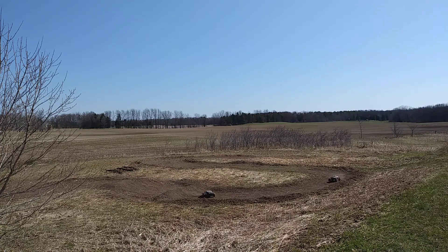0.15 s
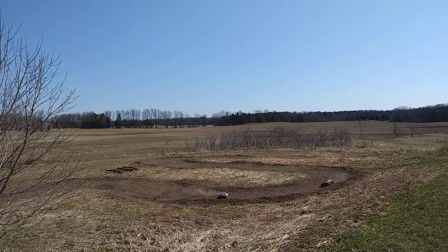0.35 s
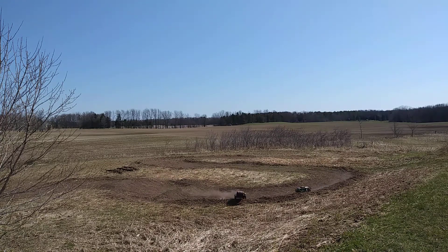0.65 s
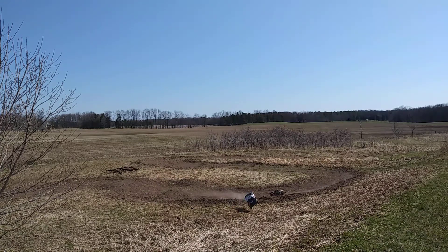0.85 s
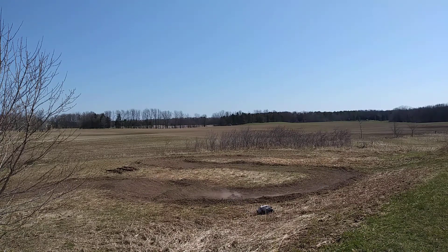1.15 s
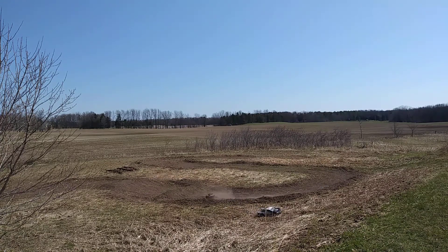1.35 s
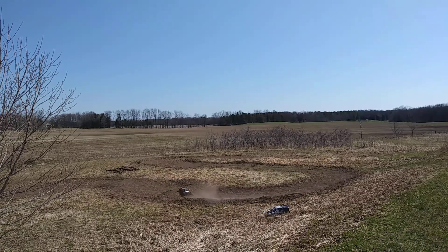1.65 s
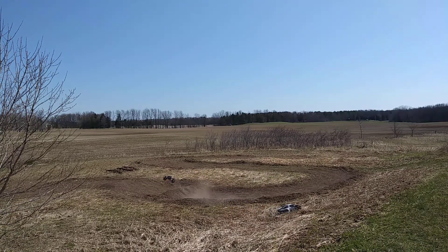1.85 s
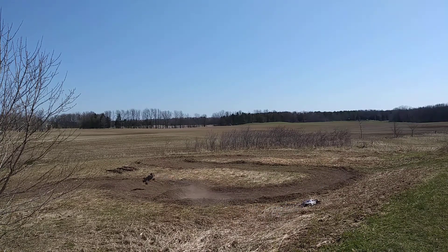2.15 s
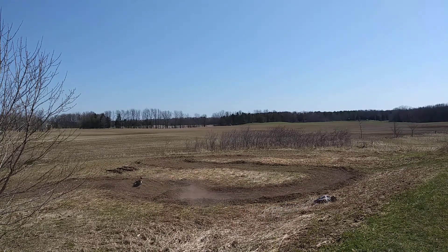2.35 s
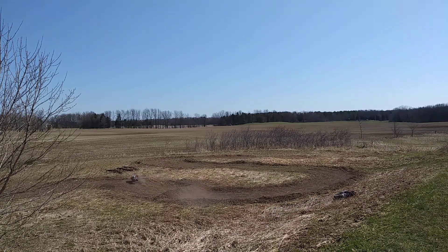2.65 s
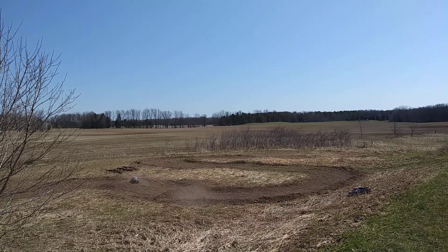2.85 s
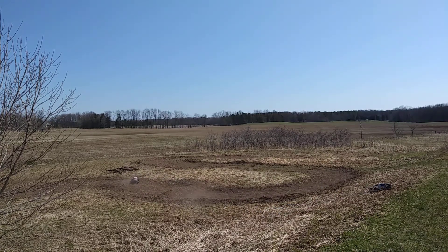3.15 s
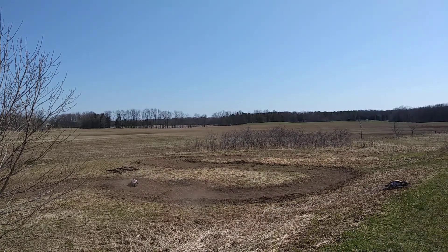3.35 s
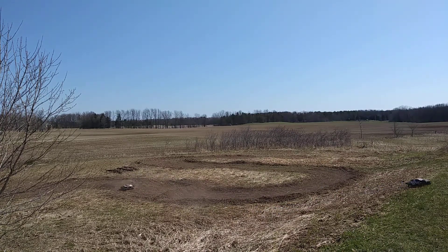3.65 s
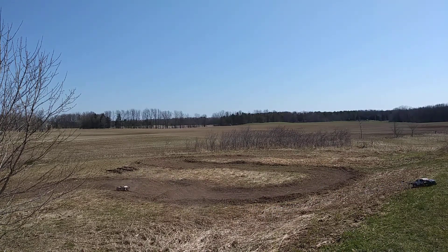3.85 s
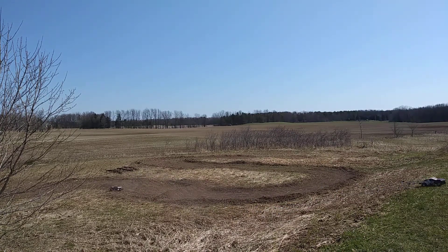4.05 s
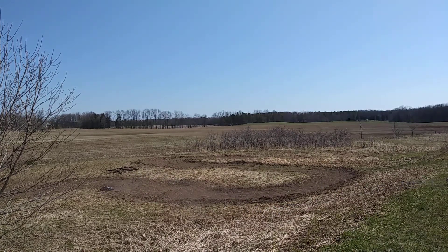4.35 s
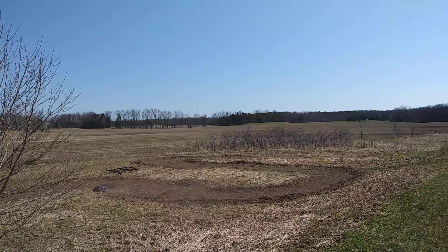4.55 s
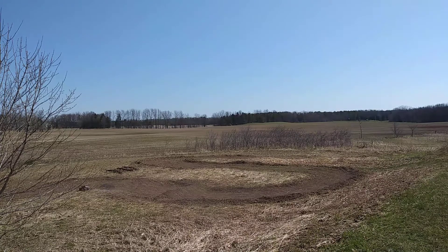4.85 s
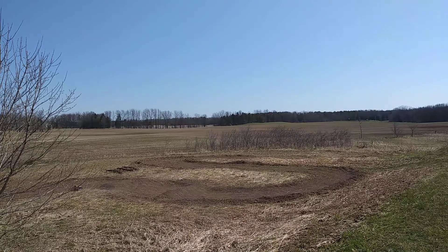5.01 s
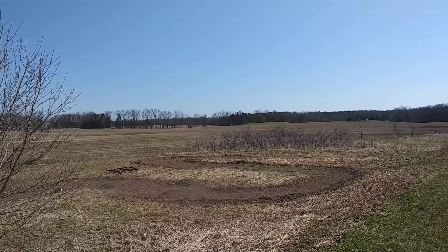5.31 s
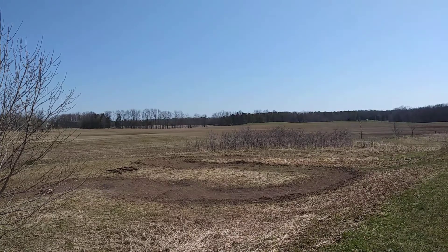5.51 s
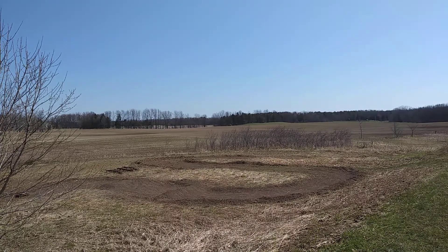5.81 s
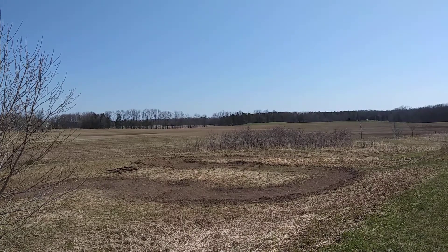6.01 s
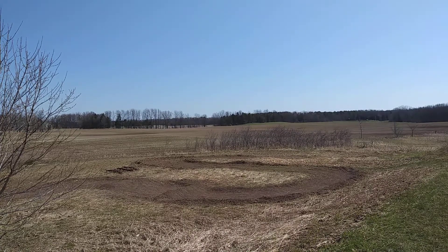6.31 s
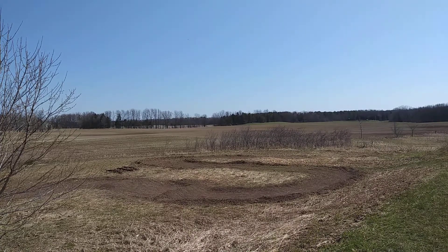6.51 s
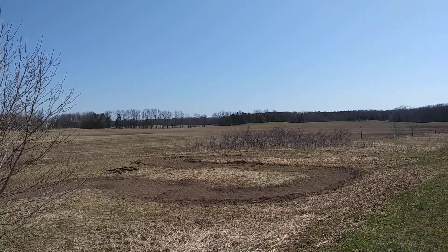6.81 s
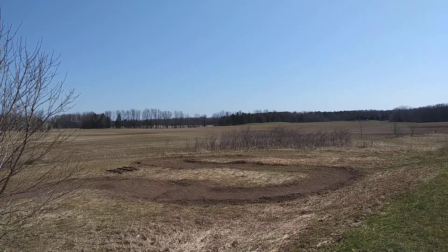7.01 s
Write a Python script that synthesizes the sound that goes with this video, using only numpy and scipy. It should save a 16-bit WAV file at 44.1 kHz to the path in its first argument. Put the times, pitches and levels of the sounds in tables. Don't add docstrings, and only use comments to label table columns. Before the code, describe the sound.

An open field heard through a small, bass-light microphone with slight noise suppression. From 0 s two electric model trucks rattle over dirt, bright grit spraying on plastic shells, with rough gear whine and low wind thumps. At about 0.6-0.75 s a dense volley of hard plastic slaps breaks out, with a narrow tyre rasp that slides on to about 1 s. The noise dips, then swells at 1.5-2.2 s with rising motor whine and loud wheelspin. A few knocks and crunches come at 2.3-2.4 s. From 2.5 to 3.5 s short, broken gear whines flutter over thinning tyre noise. Strong gusts buffet at 3.9-4.1 s alongside another throttle burst until 4.4 s. Afterwards the trucks are distant, with wavering whirr and drone and small gravel spurts near 5.7 and 6.5 s, fading by 7 s. Short clear thrush whistles recur throughout, with a quick trill around 6-6.45 s.

```python
import sys
import numpy as np
from scipy import signal
from scipy.io import wavfile
from scipy.ndimage import uniform_filter1d

SR = 44100
rng = np.random.default_rng(int(sys.argv[2]) if len(sys.argv) > 2 else 0)


def to_wav(sig):
    pcm = np.clip(np.atleast_2d(sig), -1, 1) * 32767
    pcm = np.round(pcm).astype(np.int16)
    wavfile.write(sys.argv[1], SR, pcm.T)


def gain_from_decibels(decibels):
    exponent = np.asarray(decibels, float) / 20
    return 10 ** exponent


N = 316183
STEP = 32


def control_times_s():
    return np.arange(N // STEP + 2) * STEP / SR


def in_time(rows):
    s, *columns = np.transpose(rows)
    return [np.interp(control_times_s(), s, column) for column in columns]


def fine(control):
    return np.interp(np.arange(N) / STEP, np.arange(len(control)), control)


def rms_one(x):
    return x / np.sqrt(np.mean(x ** 2) + 1e-20)


def drift(rate_hz):
    r = np.exp(-2 * np.pi * STEP * rate_hz / SR)
    noise = rng.standard_normal(N // STEP + 2002)
    return rms_one(signal.lfilter([1], [1, -2 * r, r * r], noise)[2000:])


def at_hz(points, hz):
    point_hz, level_db = np.transpose(points)
    return np.interp(np.log(hz), np.log(point_hz), level_db)


def sos(x, *design, **settings):
    return signal.sosfilt(signal.butter(*design, fs=SR, output="sos", **settings), x)


def band(x, low_hz, high_hz):
    return rms_one(sos(x, 2, [low_hz, high_hz], "band"))


def grains(per_s, spread_db):
    sizes = gain_from_decibels(spread_db * np.minimum(rng.exponential(1, N), 5)) * rng.choice([-1, 1], N)
    return rms_one(sizes * (rng.random(N) < per_s / SR))


def spells(rows, edge_db_per_s):
    t = control_times_s()
    levels_db = []
    for s, length_s, db in rows:
        outside_s = np.maximum(0, np.maximum(s - t, t - s - length_s))
        levels_db.append(db - edge_db_per_s * outside_s)
    return np.max(levels_db, axis=0)


def together(*levels_db):
    return 10 * np.log10(sum(gain_from_decibels(2 * np.maximum(db, -150)) for db in levels_db))


def bursts(events, source, noisy, late_s):
    out = np.zeros(N + 2000)
    around = np.arange(-800, 800)
    t = around / SR
    for (s, peak_db, hz, width_ms), phase in zip(events, rng.random(len(events))):
        at = round((s + late_s) * SR) + around
        sign = np.sign(np.sin(20 * phase))
        cycles = sign * np.cos(2 * np.pi * hz * t + phase - .5)
        bell = np.exp(-(1000 * t / width_ms) ** 2)
        out[at] += gain_from_decibels(peak_db) * bell * (cycles + noisy * source[at % N])
    return out[:N]


def glide(notes, wobble, shimmer_db, fade_s):
    out = np.zeros(N)
    bend = fine(1 + wobble * drift(58.0))
    swell = fine(gain_from_decibels(shimmer_db * drift(51)))
    for rows in notes:
        s, hz, level_db = np.transpose(rows)
        at = np.arange(max(int((s[0] - fade_s) * SR), 0), min(int((s[-1] + fade_s) * SR), N))
        t = at / SR
        gate = np.clip(np.minimum(t - s[0], s[-1] - t) / fade_s + .5, 0, 1)
        turns = np.cumsum(np.interp(t, s, hz) * bend[at]) / SR
        level = np.sqrt(2) * gain_from_decibels(np.interp(t, s, level_db))
        out[at] += level * gate * np.sin(2 * np.pi * turns)
    return out * swell


# (level at usual pace [dB], share of pace swing, wheelspin lift over gravel [dB])
LAYERS = [
    (-50.5, 0.36, 1.5),
    (-50, 0.61, -2),
    (-43.5, 0.38, 4.5),
    (-59.5, 0.32, -1),
]
# (start [s], length [s], gravel level [dB])
SPINS = [(0, 0.31, -51.5), (.53, .06, -54.5), (.6, 0.065, -45), (.71, 0.014, -47), (.8, 0.2, -59.5),
         (1.165, 0.0063, -58), (1.275, 0.014, -63), (1.59, .2, -46.5), (1.77, 0.358, -45),
         (2.2, 0.028, -58), (2.36, 0.033, -47.5), (2.575, 0.058, -54), (2.705, 0.061, -52),
         (2.81, 0.095, -52.5), (3.29, 0.12, -48), (4.08, 0.32, -48.5), (5.72, 1, -62), (6.545, 0.11, -48),
         (6.7, 0.075, -55)]
USUAL_PACE_DB, SPIN_EDGE_DB_PER_S = -50, 280


def loads(pace_db):
    spin_db = spells(SPINS, SPIN_EDGE_DB_PER_S)
    return [together(db + share * (pace_db - USUAL_PACE_DB), spin_db + lift_db)
            for db, share, lift_db in LAYERS]


# (time [s], pace as shell rattle [dB], share of far colour [0-1])
ROLL = [(0, -42, 0.6), (.2, -38, 0.56), (.75, -40.5, 0.5), (1.1, -49, 0.4), (1.5, -42.5, 0.97),
        (2.25, -42.5, 0.09), (2.6, -54.5, 0.38), (3.0, -63, 0.2), (3.2, -47, 0.75), (3.75, -75.5, 0.64),
        (3.92, -52, 0.38), (4.8, -54.5, 0.71), (5.07, -77, 0.7), (5.3, -63, 0.62), (5.7, -56, 0.99),
        (6.4, -60.5, 0.78), (6.85, -63, 0.46), (7.17, -64, 1)]
# (frequency [Hz], density [dB per Hz])
NEAR_COLOUR = [(350, -5), (992, 4), (1470, -6.5), (1880, -1.5), (2270, -7), (2790, -9.5), (3710, -8),
               (5080, -13.5), (7030, -20.5), (8060, -34.5), (11200, -37.5), (15500, -71.5)]
FAR_COLOUR = [(480, -31), (730, -8), (900, -22.5), (1100, -10), (1250, -10), (1600, -4.5), (1750, -12.5),
              (1950, -13), (2250, -15), (2900, -8), (3300, -10), (3750, -26), (5200, -28), (7000, -57.5)]
LAYER_EDGES_HZ = [480, 1050, 1750, 3900, 7100, 16000]
WANDER_DB = [2.2, 1.8, 2.0, 1.8, 1.4]


def tyres():
    pace_db, distance = in_time(ROLL)
    distance = np.clip(distance, 0, 1)
    levels_db = loads(pace_db)
    spin_db = levels_db[-1] + 52.0
    spray_db = np.minimum(spin_db, 3.2 * spin_db)
    levels_db.append(-63.5 + spray_db + 2.4 * drift(16) - 12 * distance)
    stones = [0.6 * grains(2500, spread_db=1.0) + rng.standard_normal(N) for k in range(2)]
    bumps_db = 1.56 * drift(58)
    out = np.zeros(N)
    for level_db, wander_db, low, high in zip(levels_db, WANDER_DB, LAYER_EDGES_HZ, LAYER_EDGES_HZ[1:]):
        edges = np.geomspace(low, high, 9)
        lows, highs = edges[:-1, None], edges[1:, None]
        centres = np.sqrt(lows * highs)
        near_db, far_db = at_hz(NEAR_COLOUR, centres), at_hz(FAR_COLOUR, centres)
        gains = np.sqrt(highs - lows) * gain_from_decibels((1 - distance) * near_db + distance * far_db)
        gains *= gain_from_decibels(level_db + bumps_db - 0.5) / np.sqrt(np.sum(gains ** 2, axis=0))
        for k, gain in enumerate(gains):
            wander = gain_from_decibels(wander_db * drift(2.34) + 1.4 * drift(12))
            out += fine(gain * wander) * band(stones[k % 2], edges[k], edges[k + 1])
    return out


# (time [s], peak [dB], frequency [Hz], half width [ms])
SLAPS = [(0.5941, -16, 2170, 0.45), (0.5997, -21, 2610, 1.1), (0.6236, -21, 2010, 1.7),
         (0.6284, -14.5, 2050, 1.3), (0.6325, -18.5, 2250, 1.5), (0.6367, -12, 2250, 0.49),
         (0.6427, -15.5, 2230, 0.34), (0.6469, -24.5, 2430, 0.76), (0.6573, -17.5, 1830, 4.8),
         (0.6605, -19, 1790, 2.8), (0.6648, -25.5, 2291, 0.6), (0.6688, -22.5, 1905, 1.5),
         (0.6742, -21.5, 1850, 3), (0.6783, -16.5, 1960, 1), (0.6932, -16, 2010, 0.86),
         (0.7561, -13, 2120, 0.31), (2.3107, -18.5, 1640, 0.64), (2.3488, -22, 1450, 0.4),
         (2.3788, -27.5, 2310, 0.37), (2.3934, -22.5, 2390, 0.8)]
# (time [s], peak [dB], frequency [Hz], half width [ms])
CRUNCHES = [(2.298, -30, 1970, 6.9), (2.355, -35.5, 1456, 17), (2.4, -35, 874, 6.6), (.72, -35, 1310, 7.2),
            (4.008, -35.5, 3380, 2.7), (5.744, -37.5, 2880, 3.6)]
# (time [s], peak [dB], frequency [Hz], half width [ms])
CRACK = (2.371, -40, 4500, 2)


def knocks():
    rattle = band(grains(1900, spread_db=3.0), 1600, 3100)
    gravel = grains(6000, spread_db=5.0)
    slaps = gain_from_decibels(-2.5) * bursts(SLAPS, rattle, noisy=0.27, late_s=0)
    crunch = band(band(gravel, 550, 3200), 500, 3600)
    bites = bursts(CRUNCHES, crunch, noisy=.8, late_s=0)
    bites += bursts([CRACK], band(gravel, 900, 6000), noisy=2.5, late_s=0)
    return sos(slaps + bites, 5, 5500)


# (start [s], length [s], level [dB])
SKIDS = [
    (.58, 0.118, -31),
    (.7, 0.07, -35),
    (.8, 0.23, -41.5),
]
# (low [Hz], high [Hz])
SCRUB_HZ = (1840, 2736)


def skid():
    rasp = band(0.14 * grains(2100, spread_db=0.0) + rng.standard_normal(N), *SCRUB_HZ)
    return fine(gain_from_decibels(spells(SKIDS, edge_db_per_s=310.0) + 2.7 * drift(52))) * rasp


# (time [s], frequency [Hz], level [dB])
STRANDS = [
    [(.15, 1780, -30.5), (.22, 1855, -33.5)],
    [(4.5, 1042, -57), (4.95, 1010, -57)],
    [(2.54, 659, -49.5), (2.75, 661, -47.5), (2.92, 639, -48)],
    [(1.5, 928, -45), (1.65, 987, -43.5), (1.77, 1110, -43)],
    [(6.7, 1715, -58), (6.92, 1685, -61.5), (7.13, 1715, -72)],
    [(5.6, 4070, -66), (6.0, 4115, -58.5), (6.85, 4180, -58)],
    [(5.78, 2390, -50.5), (5.86, 2600, -47), (5.94, 2344, -49.5)],
    [(.06, 9000, -72.5), (.3, 9000, -68.5)],
    [(1.75, 3625, -47), (2.1, 3704, -45.5)],
    [(6.5, 1008, -51.5), (6.62, 1124, -49.5)],
    [(4.06, 4000, -49.5), (4.2, 4320, -66), (4.4, 3820, -49)],
    [(5.5, 973, -60), (5.9, 1183, -57), (6.3, 1430, -60.5)],
    [(1.7, 2620, -40.5), (2.14, 2743, -43.5)],
    [(5.36, 1897, -55), (5.62, 1900, -54.5)],
    [(1.68, 5260, -50), (2.14, 5420, -63)],
    [(1.72, 11200, -74), (2.13, 11170, -72)],
    [(1.65, 7600, -65.5), (2.13, 8100, -62.5)],
    [(5.7, 5190, -59.5), (6.3, 5170, -64)],
    [(5.75, 1934, -52), (6.3, 1943, -64.5)],
    [(5.3, 3260, -69.5), (5.75, 3240, -63.5), (6.6, 3410, -48.5), (6.9, 3250, -49)],
    [(5.3, 2900, -66.5), (6.1, 2788, -45), (6.7, 3036, -73)],
]


def strands():
    out = np.zeros(N)
    for rows in STRANDS:
        s, hz, level_db = np.transpose(rows)
        at = np.arange(int((s[0] - .06) * SR), min(int((s[-1] + .06) * SR), N))
        t = at / SR
        rate_hz = 40 + .025 * hz.mean()
        spread = fine(drift(rate_hz) + 1j * drift(rate_hz))[at]
        gate = np.clip(np.minimum(t - s[0], s[-1] - t) / 0.045 + .5, 0, 1)
        carrier = np.exp(2j * np.pi * np.cumsum(np.interp(t, s, hz)) / SR)
        out[at] += gain_from_decibels(np.interp(t, s, level_db)) * gate * np.real(spread * carrier)
    return out


# (time [s], frequency [Hz])
GEARS = [
    [(0, 2020), (.12, 1880)],
    [(.26, 1990), (.34, 1980), (.4, 1836), (.46, 1920), (.55, 1900)],
    [(1.5, 1350), (1.6, 2270)],
    [(1.6, 2740), (1.665, 4090)],
    [(1.73, 1850), (1.78, 1760), (1.9, 1950), (1.98, 1880)],
    [(2.04, 1850), (2.095, 1990)],
    [(2.11, 2000), (2.16, 1545)],
    [(2.53, 1950), (2.555, 1750)],
    [(2.57, 1850), (2.59, 2150), (2.602, 1900)],
    [(2.612, 1950), (2.622, 2060), (2.64, 1550)],
    [(2.665, 1500), (2.69, 1850)],
    [(2.705, 1950), (2.75, 2060), (2.775, 1850)],
    [(2.79, 1850), (2.83, 2170), (2.85, 2150)],
    [(2.86, 1950), (2.91, 2100)],
    [(3.11, 2550), (3.15, 2450)],
    [(3.152, 1650), (3.175, 2000), (3.2, 2350)],
    [(3.245, 2800), (3.27, 2500)],
    [(3.25, 1350), (3.29, 1900)],
    [(3.29, 1950), (3.35, 2250)],
    [(3.295, 3000), (3.32, 3150), (3.34, 2800)],
    [(3.365, 2800), (3.4, 3200)],
    [(3.39, 1770), (3.5, 1850)],
    [(3.86, 1900), (3.95, 1980), (4.02, 1900), (4.07, 1950)],
    [(4.08, 2100), (4.115, 2400)],
    [(4.135, 2450), (4.152, 2550)],
    [(4.17, 2800), (4.195, 2400), (4.215, 2600), (4.25, 2300), (4.28, 2050), (4.3, 2420)],
    [(4.315, 2350), (4.34, 2400), (4.36, 2250), (4.39, 2280), (4.41, 2050)],
    [(4.22, 2700), (4.242, 2900)],
]
GEAR_DB = [-46, -46.5, -47, -42, -42, -40, -46, -45, -43, -42, -43, -44, -45, -49, -49, -44, -47, -51, -44,
           -45, -47, -50, -48, -46, -43, -44, -44, -44]
# (time [s], frequency [Hz], level [dB])
DRONE = [(5.95, 760, -59), (6.296, 718, -55), (6.39, 780, -55), (6.498, 703.6, -55), (6.7, 725, -69),
         (6.79, 740, -50.5), (6.9, 774, -64), (7.05, 819, -58.5), (7.12, 647, -55)]


def gears():
    whines = [[(s, hz, db) for s, hz in rows] for db, rows in zip(GEAR_DB, GEARS)]
    mesh = glide(whines, wobble=.022, shimmer_db=3.2, fade_s=.01)
    drone = glide([DRONE], wobble=0.045, shimmer_db=4.5, fade_s=0.2)
    return mesh + strands() + drone


# (low [Hz], high [Hz])
WHIRR_HZ = (3000, 4000)
WHIRR_DB = -63


def far_whirr():
    return gain_from_decibels(WHIRR_DB) * fine(gain_from_decibels(2.0 * drift(14))) * band(rng.standard_normal(N), *WHIRR_HZ)


# (time [s], level [dB])
WIND = [(0.0, -41.5), (0.32, -57.5), (0.68, -52.5), (0.98, -59.5), (1.24, -62), (1.56, -47), (1.69, -63),
        (3.39, -64), (4.01, -52), (4.51, -60), (4.65, -65), (5.37, -68), (5.81, -58), (6.09, -67),
        (6.49, -73.5), (6.9, -74), (7.17, -75.5)]
# (frequency [Hz], density [dB per Hz])
FLUTTER = [(150, 2.5), (250, 14), (450, 7.5), (700, 0), (1100, -33.5), (1600, 0)]
# (start [s], length [s], level [dB])
GUSTS = [(0.04, 0.089, -28.5), (0.232, 0.043, -33), (0.45, 0.11, -32.5), (0.648, 0.085, -33.5),
         (0.775, 0.077, -30.5), (1.352, 0.052, -35.5), (1.652, 0.092, -35), (1.891, 0.069, -31.5),
         (2.033, 0.08, -36.5), (2.19, 0.047, -36.5), (2.455, 0.099, -32), (3.065, 0.063, -38.5),
         (3.104, 0.063, -36.5), (3.536, 0.15, -36), (3.773, 0.031, -36.5), (3.923, 0.234, -26.5),
         (4.305, 0.021, -33), (4.464, 0.032, -31), (4.585, 0.025, -33), (5.432, 0.058, -39.5),
         (5.582, 0.089, -35)]
# (peak time [s], peak [dB], frequency [Hz], half width [ms])
THUMPS = [(0.0375, -32.5, 487, 3.9), (0.0625, -17.5, 425, 1.3), (0.0754, -18, 482, 1.3),
          (0.0907, -18, 426, 3), (0.0983, -19, 570, 0.65), (0.1277, -28, 403, 3.2), (0.1569, -28, 415, 1.6),
          (0.1732, -32, 444, 4.2), (0.1856, -22, 377, 2.3), (0.1996, -27.5, 378, 1.9),
          (0.2685, -15.5, 496, 1.63), (0.2798, -26, 434, 3.5), (0.3839, -26, 520, 2.7),
          (0.4719, -15, 430, 2.4), (0.5435, -25.5, 426, 2.3), (0.5609, -21.5, 423, 1.2),
          (0.5924, -27, 466, 1.8), (0.6229, -22.5, 404, 1.2), (0.7015, -23.5, 485, 1.3),
          (0.711, -25.5, 728, 1.2), (0.7918, -33, 388, 6.6), (0.8037, -20, 595, 1.2),
          (0.8155, -20, 460, 2.5), (0.8376, -28.5, 360, 2.7), (0.8499, -9.5, 495, 1),
          (0.8583, -20.5, 458, 3.9), (1.4742, -27.5, 454, 4.8), (1.4844, -13.5, 520, 1.4),
          (1.4972, -16.5, 409, 1.4), (1.5258, -32.5, 466, 4), (1.7148, -29, 608, 0.96),
          (1.8972, -24.5, 482, 1.1), (1.9309, -37, 508, 1.5), (2.2372, -20, 423, 1.1),
          (2.3605, -28, 745, 1.6), (2.4744, -29.5, 440, 0.97), (2.4867, -20.5, 536.4, 0.35),
          (2.5093, -24.5, 644, 1.4), (2.5186, -22, 355, 2.4), (2.6071, -26.5, 366, 2.1),
          (2.6278, -33, 562, 0.93), (3.0731, -24, 478, 0.4),
          (3.1703, -27.5, 376, 1.9), (3.5514, -34.5, 358, 2.7), (3.6047, -18.5, 560, 0.84),
         (3.6305, -18, 567, 0.63), (3.649, -28, 443, 2.7), (3.6625, -20, 378, 2.2),
         (3.9245, -18.5, 441, 3.3), (3.9436, -19, 374, 5), (3.954, -29.5, 448, 1.9),
         (3.9695, -24.5, 500, 0.57), (3.9877, -20, 486, 0.96), (4.0052, -28, 438, 0.84),
         (4.021, -29.5, 426, 2.5), (4.0342, -33.5, 514, 2.8), (4.042, -16, 459, 3.2), (4.05, -12, 495, 2.1),
         (4.062, -23.5, 380, 2.1), (4.0756, -14, 520, 2.1), (4.0814, -13, 462, 0.77),
         (4.0948, -24.5, 530, 0.86), (4.117, -23.5, 376, 2.3), (4.1266, -23.5, 390, 0.84),
         (4.137, -21, 573, 1), (4.3148, -26.5, 390, 1.8), (4.329, -19, 443, 1.2), (4.3399, -25, 408, 2.9),
         (4.4002, -21, 434, 2.2), (4.4737, -20.5, 450, 2.7), (4.4856, -17, 544, 0.69),
         (4.4978, -21.5, 393, 2), (4.5953, -24, 348, 1.7), (4.621, -36.5, 353, 1.3),
         (4.7052, -37, 335, 7.8), (4.717, -36, 330, 2.5), (4.741, -40, 350, 0.77), (4.537, -32.5, 447, 1.7),
         (4.8469, -34.5, 357, 4.8), (5.4163, -28, 412, 1.7), (5.437, -30, 366, 3.1),
         (5.6264, -30.5, 335, 2.4), (5.635, -37, 338, 2.6), (5.6762, -32, 442, 1.5),
         (5.9583, -33, 439, 2.9), (5.992, -35, 335, 2.7), (5.9974, -33, 492, 1.5),
          (4.997, -41, 398, 3.5), (5.023, -40.5, 443, 2), (5.104, -39.5, 454, 2.1), (6.52, -38.5, 284, 5.9),
         (6.541, -33.5, 330, 1.6), (6.772, -41, 301, 2.3), (6.997, -45, 306, 2.2), (7.143, -45.5, 227, 3)]
GUST_EDGE_DB_PER_S, GUST_BED_DB = 897, -8


def wind():
    lumps = .5 * grains(250, spread_db=3.0) + rng.standard_normal(N)
    edges = np.geomspace(130, 1700, 9)
    flutter = np.zeros(N)
    for low, high in zip(edges, edges[1:]):
        density = gain_from_decibels(at_hz(FLUTTER, np.sqrt(low * high)))
        flutter += np.sqrt(high - low) * density * band(lumps, low, high)
    flutter = rms_one(flutter)
    gusts_db = spells(GUSTS, GUST_EDGE_DB_PER_S) + GUST_BED_DB + 3.5 * drift(70)
    breeze_db = in_time(WIND)[0] + 0.62 + 4 * drift(35)
    bed = fine(gain_from_decibels(together(breeze_db, gusts_db))) * flutter
    eddies = bursts(THUMPS, flutter, noisy=0.46, late_s=-0.00066)
    return sos(bed + eddies, 3, 1400)


# (start [s], length [s], from [Hz], to [Hz], level [dB])
SONG = [(.52, 0.046, 3160, 3120, -40.5), (1.28, 0.03, 2560, 2420, -40.5), (1.608, 0.038, 3150, 3100, -38.5),
        (2.39, .08, 2560, 2646, -41), (3.6, .088, 2517, 2623, -39.5), (3.735, 0.062, 2285, 1840, -49.5),
        (4.488, 0.048, 1386, 1996, -43.5), (4.518, 0.071, 1970, 1910, -35), (4.61, 0.027, 1884, 1870, -43),
        (4.758, 0.038, 1790, 1950, -35.5), (4.795, .075, 2070, 1963, -44.5), (6.48, 0.032, 2975, 2884, -38),
        (6.632, 0.029, 2940, 2870, -42)]
# (time after its start [s], length [s], from [Hz], to [Hz], level [dB])
PHRASE = [(0, .022, 2700, 3080, -41), (.026, .042, 2760, 2770, -39), (.074, .07, 2130, 1900, -49),
          (.148, .08, 2570, 2410, -53), (.235, .08, 1900, 1793, -55)]
# (time [s], level [dB])
PHRASES = [(2.949, 0.093), (5.078, -0.095)]
NOTE_RISE_DB, NOTE_FALL_DB, NOTE_EARLY_BEND = 3, 4, .7


def notes():
    rows = list(SONG)
    for at, loud_db in PHRASES:
        rows += [(at + s, length, a, b, db + loud_db) for s, length, a, b, db in PHRASE]
    return [[(s, a, db - NOTE_RISE_DB),
             (s + length / 2, a + NOTE_EARLY_BEND * (b - a), db),
             (s + length, b, db - NOTE_FALL_DB)] for s, length, a, b, db in rows]


# (time [s], peak [dB], frequency [Hz])
TRILL = [(5.955, -37.5, 2860), (6.001, -40, 2940), (6.027, -37.5, 2760), (6.074, -38.5, 2710),
         (6.12, -36.5, 2800), (6.145, -36, 2900), (6.17, -38.5, 3000), (6.228, -40.5, 2900),
         (6.367, -35.5, 3070), (6.388, -38, 2960), (6.407, -33.5, 3130), (6.43, -37.5, 3100),
         (6.45, -39.5, 3400)]
CHIRP_S, CHIRP_FALL = .0045, .06


def thrush():
    chirps = [[(s - CHIRP_S, hz * (1 + CHIRP_FALL), db - 2.5),
               (s + CHIRP_S, hz * (1 - CHIRP_FALL), db - 5.5)] for s, db, hz in TRILL]
    song = glide(notes() + chirps, wobble=0.0031, shimmer_db=1.2, fade_s=.008)
    for lag_s, echo_db in ((.045, -20.5), (.095, -18)):
        song = song + gain_from_decibels(echo_db) * np.roll(song, int(lag_s * SR))
    return song


HUM_DB = -47


def field_rumble():
    level_db = HUM_DB + .5 * (in_time(WIND)[0] + 57.5)
    return fine(gain_from_decibels(level_db)) * band(rng.standard_normal(N), 80, 398)


# (start [s], length [s], frequency [Hz], width [octaves], depth [dB])
DIPS = [(4.97, .28, 1400, .4, 6), (5.25, .2, 1050, .25, 13), (5.03, .57, 2250, .07, 12),
        (5.38, .32, 2550, .04, 12), (6.12, .14, 1100, .15, 10), (6.36, .09, 1200, .13, 14),
        (6.25, .2, 2530, .06, 13), (5.4, .13, 1450, .07, 12), (7.0, .2, 2000, .6, 9),
        (3.6, .22, 1500, .3, 7), (2.95, .2, 1400, .15, 6)]
DIP_EDGE_S = 0.044


def ground_echo(x):
    hz, t, bins = signal.stft(x, fs=SR, nperseg=1024, noverlap=768)
    loss_db = 0
    for s, length_s, centre_hz, octaves, depth_db in DIPS:
        shape = np.exp(-(np.log2((hz[:, None] + 1) / centre_hz) / octaves) ** 2)
        gate = np.clip(np.minimum(t - s, s + length_s - t) / DIP_EDGE_S + .5, 0, 1)
        loss_db = loss_db + depth_db * shape * gate
    return signal.istft(bins * gain_from_decibels(-loss_db), fs=SR, nperseg=1024, noverlap=768)[1][:N]


LEAVE_S, LEAVE_DB_PER_S, LEAVE_MOST_DB = 6.92, 86.5, 4.5


def scene():
    leaving_db = np.clip(LEAVE_DB_PER_S * (np.arange(N) / SR - LEAVE_S), 0, LEAVE_MOST_DB)
    trucks = gain_from_decibels(-leaving_db) * (tyres() + knocks() + gears() + field_rumble())
    ground = trucks + skid() + far_whirr() + wind()
    return (ground_echo(ground) + thrush())[None]


def suppress(x, depth, least_db):
    f, t, bins = signal.stft(x, nperseg=512, noverlap=384)
    power = uniform_filter1d(np.abs(bins) ** 2, size=21, axis=-1) + 1e-16
    learnt = np.exp(np.mean(np.log(power), axis=-1, keepdims=True))
    gain = np.sqrt(np.maximum(1 - depth * learnt / power, gain_from_decibels(2 * least_db)))
    return signal.istft(bins * gain, nperseg=512, noverlap=384)[1][..., :N]


def band_limit(x):
    return signal.sosfilt(signal.butter(12, 15630, fs=SR, output="sos"), x)


# (frequency [Hz], width [Hz])
NOTCHES = [(121, 83), (7100, 750), (9520, 490)]
HISS_DB = -84


def record(dry):
    x = sos(dry, 3, 190, "high")
    for hz, width_hz in NOTCHES:
        x = signal.lfilter(*signal.iirnotch(hz, hz / width_hz, fs=SR), x)
    x = suppress(x, depth=.1, least_db=-11)
    hiss_filter = signal.cheby2(12, 40, 12900, fs=SR, output="sos")
    hiss = signal.sosfilt(hiss_filter, rng.standard_normal(x.shape))
    return band_limit(x + gain_from_decibels(HISS_DB) * hiss)


dry = scene()
out = record(dry)
to_wav(out)
```